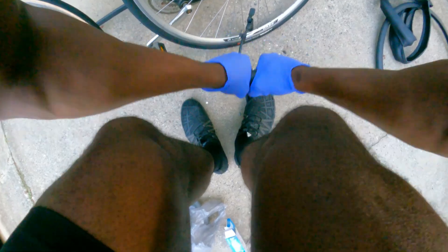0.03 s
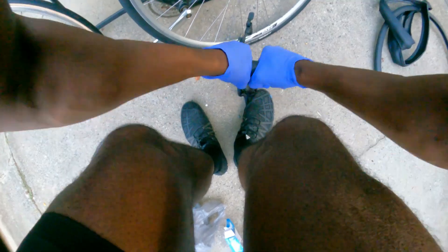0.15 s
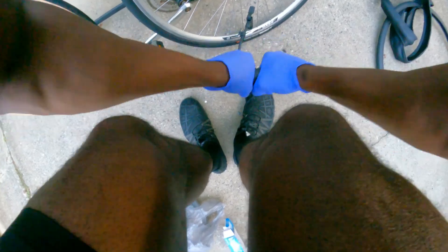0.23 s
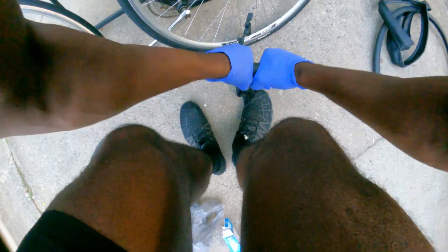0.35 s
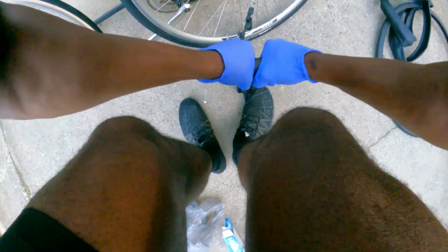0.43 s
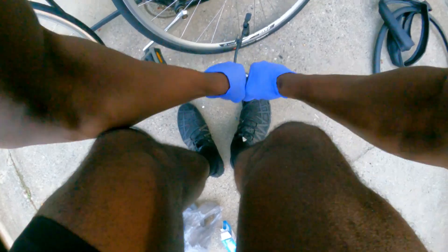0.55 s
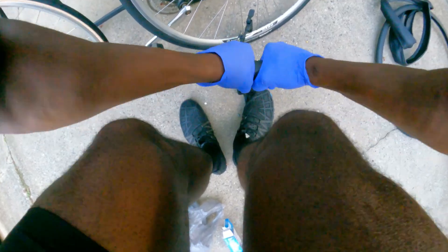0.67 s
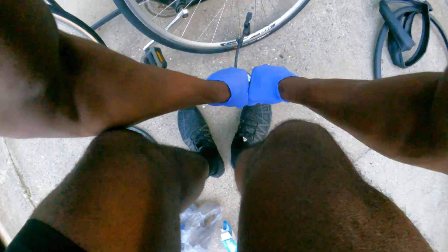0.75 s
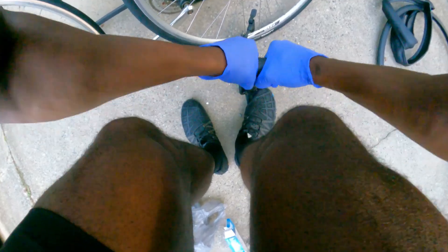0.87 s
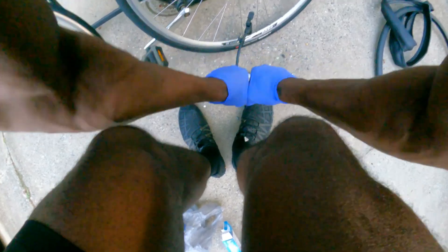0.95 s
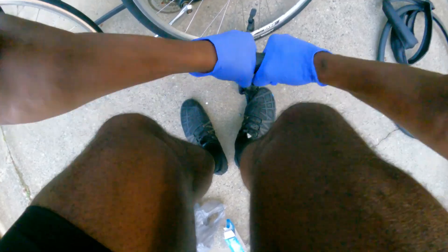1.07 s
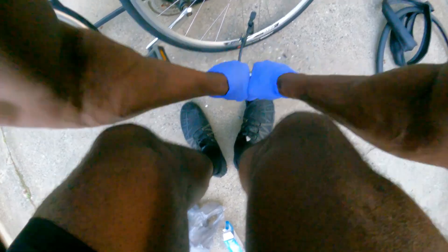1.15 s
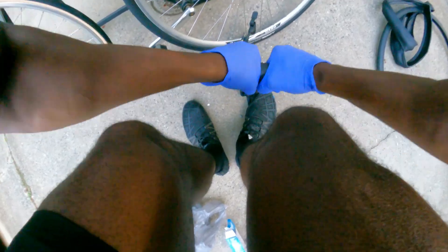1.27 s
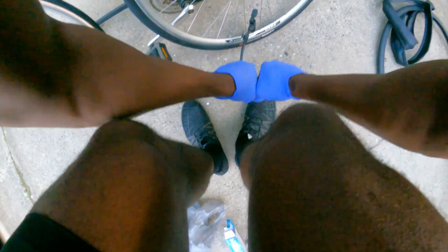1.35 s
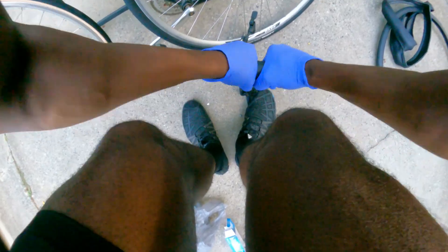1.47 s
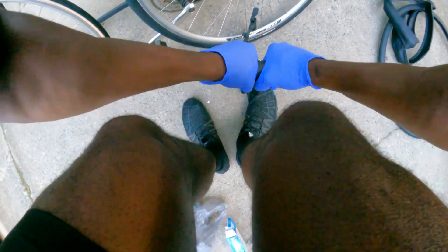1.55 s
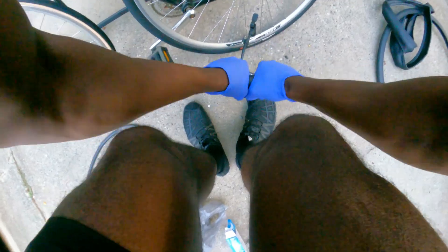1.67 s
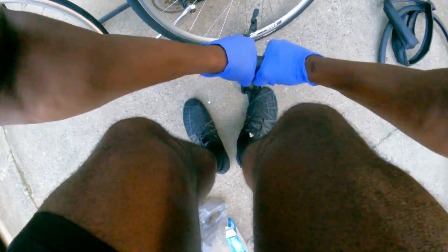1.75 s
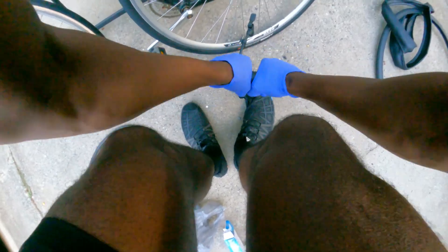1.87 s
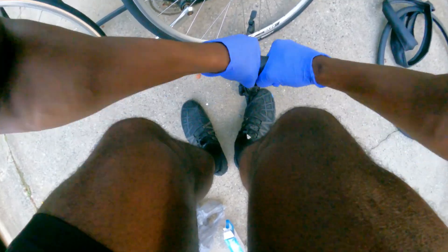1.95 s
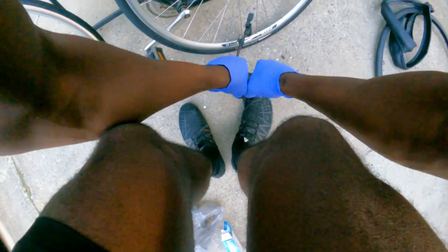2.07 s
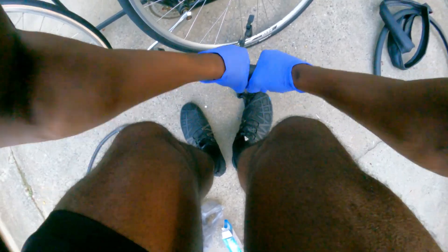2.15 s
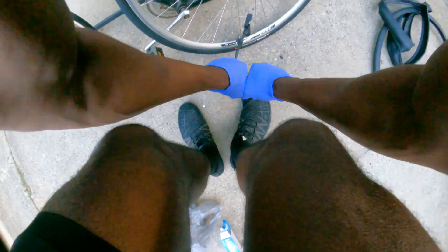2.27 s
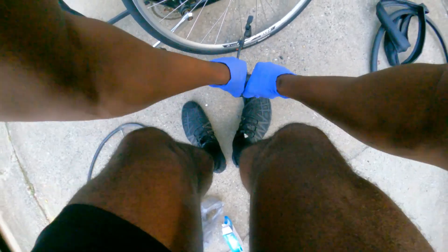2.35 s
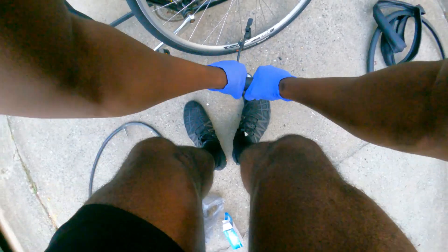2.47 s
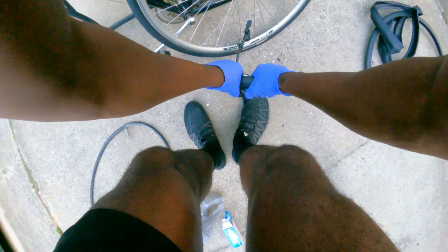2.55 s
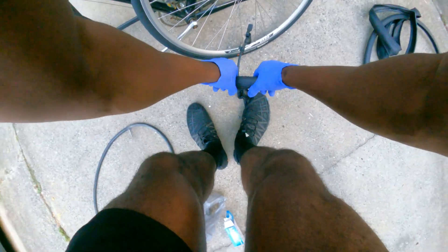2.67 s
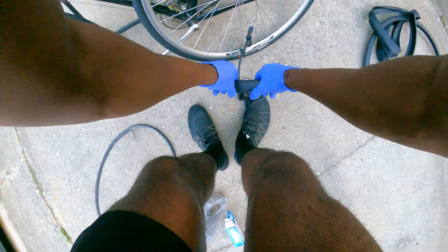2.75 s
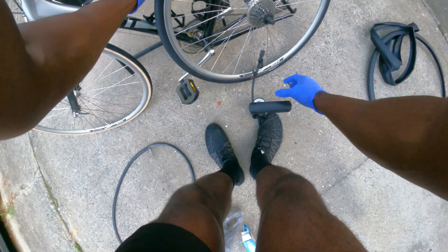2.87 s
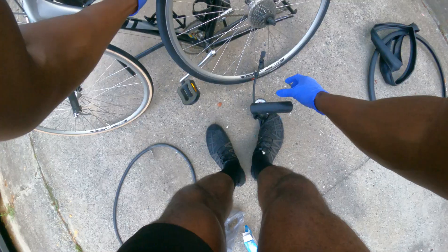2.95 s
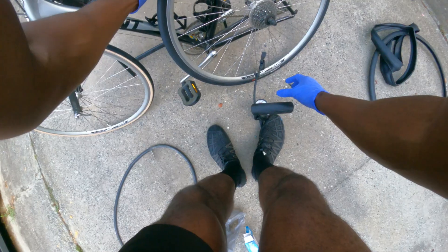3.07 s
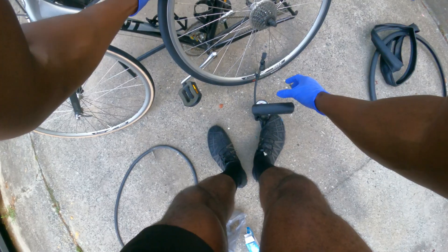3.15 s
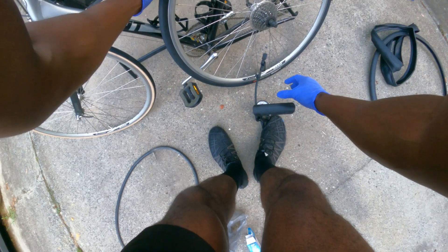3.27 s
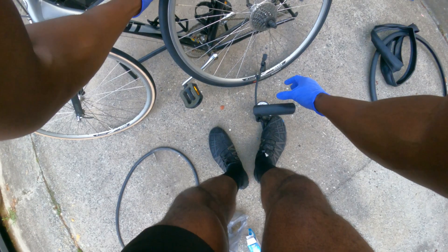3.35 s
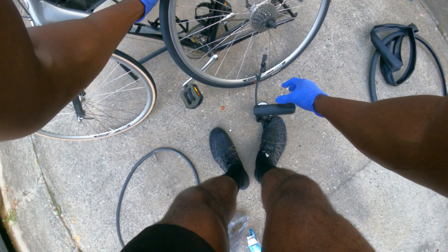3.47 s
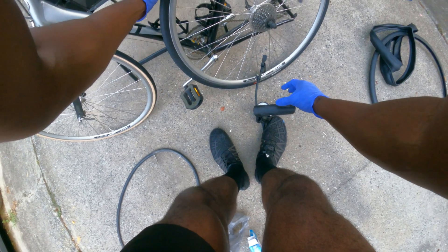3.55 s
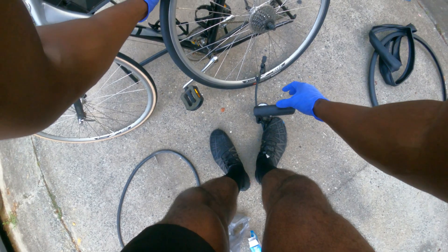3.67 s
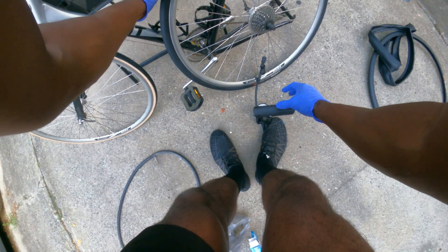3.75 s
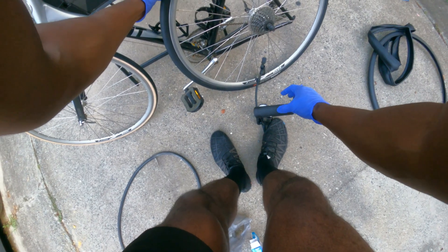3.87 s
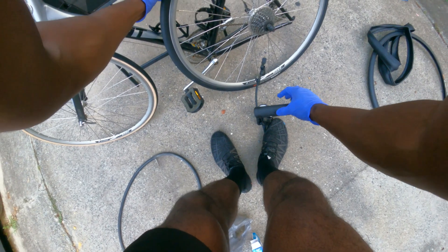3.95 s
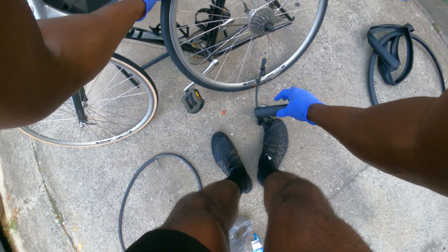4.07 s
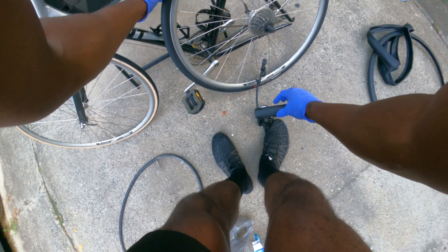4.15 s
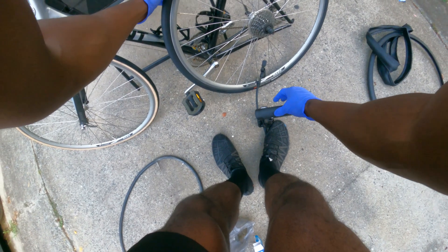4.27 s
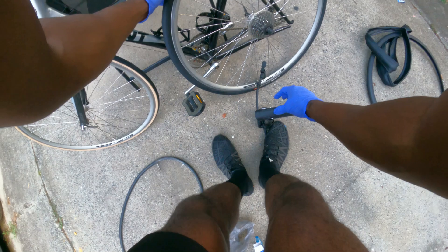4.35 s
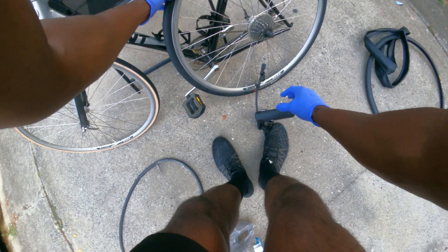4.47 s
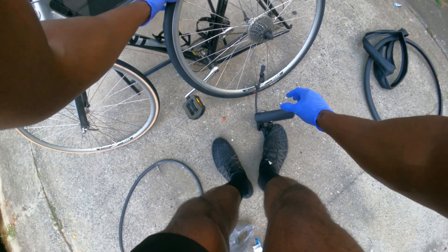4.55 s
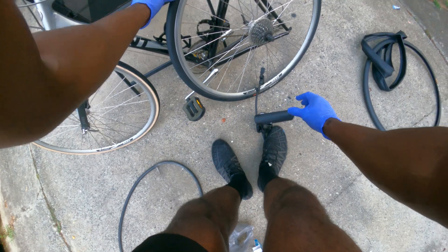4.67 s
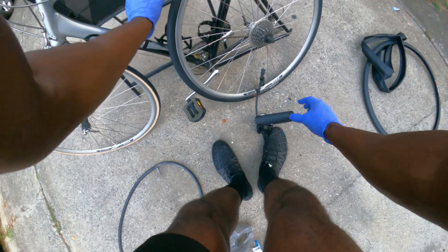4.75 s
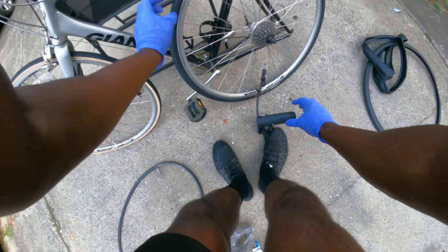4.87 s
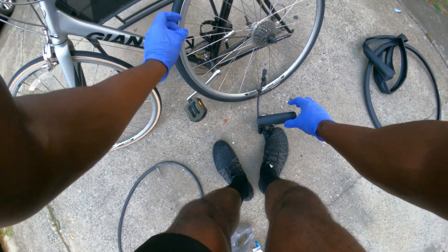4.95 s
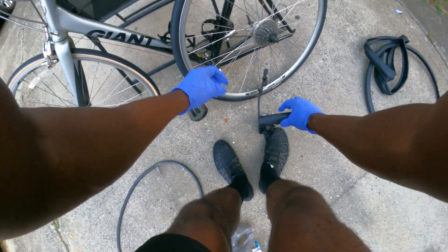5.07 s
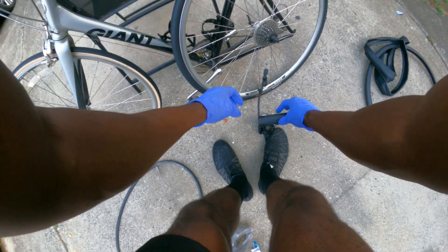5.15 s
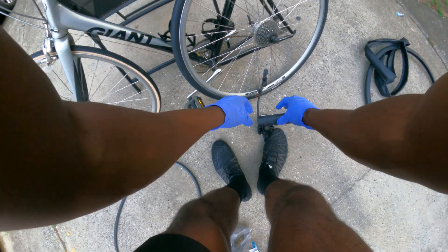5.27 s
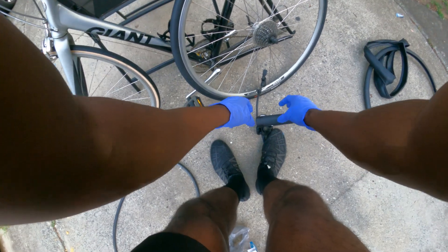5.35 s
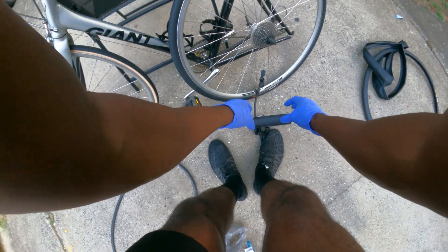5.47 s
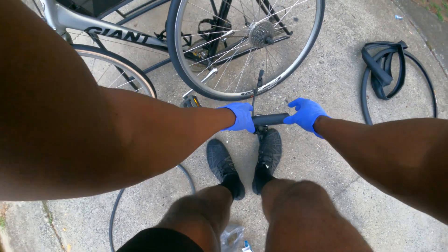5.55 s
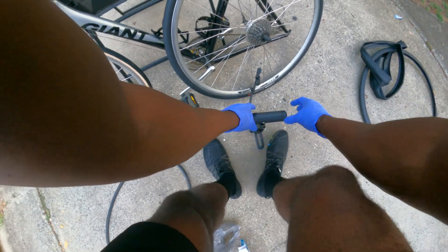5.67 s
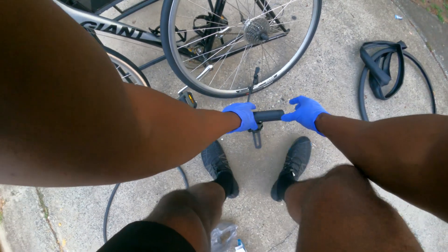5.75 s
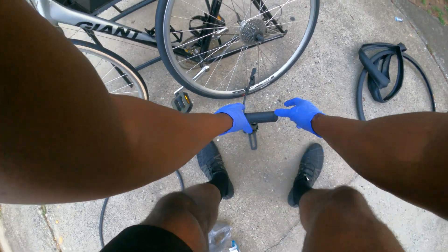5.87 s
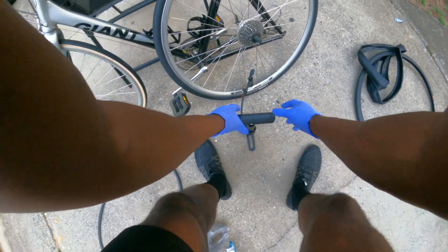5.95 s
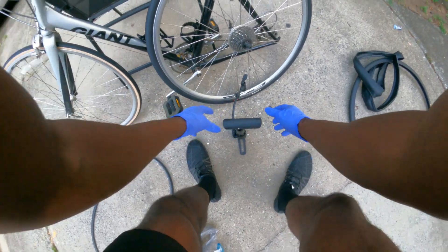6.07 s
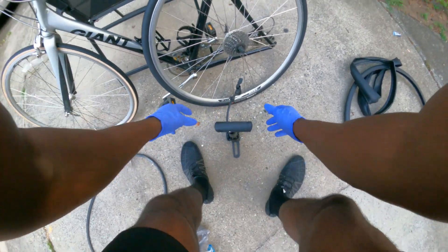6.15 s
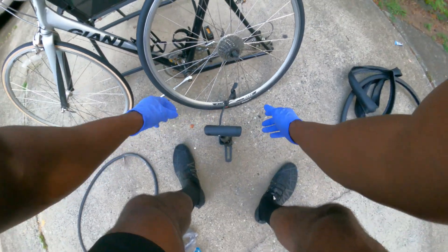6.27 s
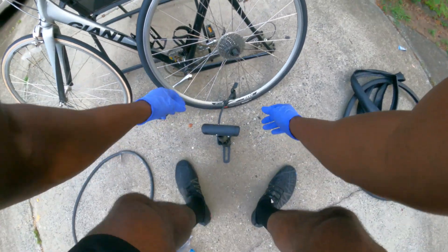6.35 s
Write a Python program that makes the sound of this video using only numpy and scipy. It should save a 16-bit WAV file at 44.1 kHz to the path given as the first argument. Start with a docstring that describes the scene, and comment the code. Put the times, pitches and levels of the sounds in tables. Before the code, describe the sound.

Outdoors on concrete, a body-worn microphone just above a bicycle pump catches twelve fast, loud clacks, uneven in brightness, with low jolts, rubbing and thin squeaky air on each upstroke. The pumping ends abruptly. Distant rumble remains, a nearby songbird chirps three quick phrases, farther birds whistle downward, plastic clicks under a gloved hand, and a hollow thump and scuffing soles close the scene.

```python
"""Floor pump on a concrete yard

Twelve fast strokes, close below a worn camera with two microphone ports: struck-body clacks, valve
snaps, knocks of the loose rod, filtered-noise rubbing and inlet air laced with thin whistles.
Then the pump is let go: resonant clicks and bumps, noise scuffs from the shoes, gliding-tone songbirds.
Walls and trees answer with scattered echoes, over a low outdoor rumble of coloured noise."""
import sys
import numpy as np
from scipy import signal
from scipy.fft import rfft, irfft
from scipy.io import wavfile

SR = 44100
rng = np.random.default_rng(int(sys.argv[2]) if len(sys.argv) > 2 else 0)


def store_pcm(level_fs):
    """Save levels as 16-bit WAV."""
    pcm = np.round(np.clip(level_fs, -1, 1) * 32767).astype(np.int16)
    wavfile.write(sys.argv[1], SR, np.atleast_2d(pcm).T)


N = 282681
T = np.arange(N) / SR  # s

# piston hits bottom: start_s, level_db, crack_db and thud_db (both relative), valve_lead_s
STROKES = [(0.029, -5.5, 5.5, -0.5, 0.013), (0.2508, -5, -7, -6, 0.02), (0.4513, -4.5, 6, 0.5, 0.0083),
           (0.6816, -5, 3, 0, 0.01), (0.9012, -5, 7.5, 0.5, 0.0078), (1.1223, -4.5, -1, -2.5, 0.011),
           (1.3420, -5, -5.5, -3, 0.015), (1.5644, -7.5, -5, 0, .0144), (1.7741, -3, -8, -10, .0096),
           (1.9864, -3, -1, -5, 0.0066), (2.2124, -6.5, 8, 3.5, .0067), (2.4495, -5, 1.5, -0.5, 0.0073)]
# rod knocks, mostly as the handle turns at the top: start_s, level_db, low_db (relative)
ROD_KNOCKS = [(.088, -26, -3), (.170, -33.5, 7), (.372, -27.5, -2.5), (.608, -26, -12), (.657, -35, -16),
              (.838, -34, 5.5), (.863, -31.5, -14), (1.080, -27, -16), (1.267, -24.5, -3), (1.489, -33, 4),
              (1.537, -39, -8), (1.706, -32.5, 3.5), (1.922, -38.5, 8.5), (2.149, -33.5, 6),
              (2.384, -31.5, 3), (2.577, -34.5, -10), (2.706, -35, -7)]
# hands and shoes bump the pump: start_s, level_db, thump_db and ring_db (both relative)
BUMPS = [(5.3594, -20.5, 2, -8.5), (6.071, -37, 1, -23), (6.0789, -26, -9, -39), (6.2333, -25.5, -14, -2)]
# small plastic clicks as the handle is touched: start_s, level_db, centre_hz, t60_s
CLICKS = [(3.309, -34.5, 5500, 0.026), (3.428, -37, 5500, 0.08), (3.434, -36, 2180, 0.094),
          (3.467, -38.5, 5500, 0.055), (3.481, -34, 4560, 0.036), (3.486, -34.5, 1300, 0.1),
          (4.606, -37.5, 3050, 0.018), (4.6393, -28.5, 2220, 0.016)]
# spectra of a blow on the barrel, the foot and the small fittings: freq_hz, level_db (relative)
BARREL = [(450, -37), (700, -10.5), (900, 3), (1200, 5.5), (1500, 2), (1750, 1), (2150, -15.5), (2900, -18),
          (4500, -36.5), (9000, -63)]
FOOT = [(30, -14.5), (110, 4), (210, -1), (350, -2.5), (480, -11), (650, -26), (2000, -54)]
FITTINGS = [(900, -32), (2000, 6), (2800, 9.5), (4600, 4), (7000, -5.5), (9000, -25), (12000, -25),
            (15000, -37)]
# spectrum of the valve snap and of the air through it: freq_hz, level_db (relative)
VALVE_TONE = [(1500, -7), (3000, -6.5), (3700, 1), (5500, -2.5), (6500, -13.5), (7600, -8.5), (9500, -22),
              (12000, -19), (15000, -48)]
# air inlet resonances: freq_hz, width_hz (doubled in each of two passes), level_db (relative)
INLET = [(3050, 140, -18), (3670, 110, 6), (4940, 110, -10), (5760, 260, 11), (7200, 150, -1),
         (7000, 380, 9.5), (11900, 800, 8)]
# spectrum of the seal rubbing along the barrel: freq_hz, level_db (relative)
SEAL_RUB = [(120, -34), (200, -7), (282, -20), (591, -14), (761, -28.5), (929, -11), (1070, -24.5),
            (1570, -26), (2550, -30.5), (3600, -26), (5070, -28.5), (6770, -32), (9550, -38),
            (11900, -39.5), (15000, -60)]
# a near songbird's phrase, one row a note:
# start_s (from its loudest note), length_s, start_hz, middle_hz, end_hz, level_db (relative)
PHRASE = [(-.138, 0.1, 2410, 2440, 2505, -18.5), (-.068, .055, 2514, 3080, 2900, -12),
          (0, .092, 3950, 3662, 3040, -4.5), (.12, .02, 6700, 5500, 4450, -22),
          (.137, .022, 4600, 5080, 5400, -10), (.154, .02, 4315, 3095, 2060, -11),
          (.17, 0.051, 2150, 1846, 1610, -16)]
# when the phrase is sung: loudest_note_s, level_db
PHRASE_TIMES = [(3.373, -36.5), (3.79, -33), (4.206, -33)]
# a farther bird's falling whistle: start_s, length_s, start_hz, middle_hz, end_hz, level_db (relative)
FALLING_WHISTLE = [(0.0026, .35, 3650, 2140, 1610, -7.5)]
# when it falls: start_s, level_db
FALLING_TIMES = [(3.621, -53.5), (4.18, -50), (4.741, -52), (5.295, -52.5), (5.85, -53.5)]
# a short far peep, up and partly down: start_s, length_s, start_hz, middle_hz, end_hz, level_db (relative)
PEEP = [(0.0015, 0.067, 2100, 4700, 3460, -5)]
# when it peeps: start_s, level_db
PEEP_TIMES = [(5.66, -65), (5.95, -62), (6.165, -54)]
# a low far whistle, sinking a little: start_s, length_s, start_hz, middle_hz, end_hz, level_db (relative)
LOW_WHISTLE = [(0.0029, 0.21, 2160, 2100, 1880, 0.5)]
# when it whistles: start_s, level_db
LOW_WHISTLE_TIMES = [(5.78, -60), (6.3, -53.5)]
# spectrum of soles on concrete: freq_hz, level_db (relative)
SOLE = [(500, 2), (1200, -1.5), (3800, -4), (7000, -5.5), (9000, -14.5), (12000, -18), (14500, -39)]
# shoe soles drag over concrete: loudest_s, rise_s, fall_s, level_db
SCUFFS = [(2.68, 0.23, 0.21, -62), (4.83, .05, 0.034, -62), (5.82, 0.091, 0.081, -52),
          (6.26, 0.18, 0.094, -49), (6.4, .05, .06, -55.5)]
# spectrum of the open yard before its final shaping: freq_hz, level_db (relative)
YARD = [(15, -48), (25, -5), (54, -0.5), (104, -9), (177, -9.5), (286, -16.5), (344, -21), (403, -22.5),
        (539, -33), (824, -25.5), (1510, -30), (1820, -31), (3100, -44), (7610, -46), (14000, -82)]
# how wide the yard stands, before the same shaping: freq_hz, side_minus_mid_db
YARD_SIDE = [(60, -24), (110, -19), (200, -14.5), (370, -9.5), (690, -4), (1270, -6), (2340, -2),
             (4310, -7), (7940, -15), (14600, -14)]
# course of the yard's level, before a common lift: time_s, level_db
YARD_LEVEL = [(2.5, -47.5), (2.85, -51.5), (3.1, -46), (3.6, -45.5), (4.4, -44), (5.3, -43), (6.4, -43)]
# spectrum of a knock on the plastic handle: freq_hz, level_db (relative)
HANDLE = [(90, -18), (200, -45), (600, -2.5), (800, -5.5), (1150, 4.5), (1650, 1), (2100, -11), (3600, -19),
          (5200, -18.5), (8000, -28), (13000, -58)]
# ringing modes of the rod: freq_hz, level_db (relative), t60_s
ROD_MODES = [(3430, -4, 0.13), (3630, 9, 0.02), (4727, -15, .05)]
# how far the left microphone port lags the right: freq_hz, lag_rad
PORTS = [(100, .1), (350, .5), (690, .9), (1000, .6), (1400, .9), (2100, 1.4), (2900, .2), (4300, .6),
         (6400, .4), (8000, .1)]

TOP_HZ = 14300  # upper edge of the camera's passband
# the firmer the thud, the stronger the piston rebounds
REBOUND_DB, REBOUND_PER_THUD_DB = -10.5, 1.3
VALVE_DB = -22.5
ROD_BRIGHT_DB = 7.5
# the pull lifts the foot with a dull knock, at this share of the time to the next clack
LIFT_SHARE, LIFT_DB, LIFT_LOW_DB, LIFT_BRIGHT_DB = .23, -34, 8, 12
# the rod chatters on the way down: window before the clack (s), then level and colour
CHATTER_FROM_S, CHATTER_TO_S = 0.033, .014
CHATTER_DB, CHATTER_LOW_DB, CHATTER_BRIGHT_DB = -32.5, -11.5, 7
# it also ticks anywhere in the stroke; the scatter is for chatter and ticks alike
TICK_DB, TICK_LOW_DB, TICK_BRIGHT_DB, SCATTER_DB = -42.5, -2, 6, 5
# the glove crackles as it closes on the handle, up to the spread before or after
GRIP_S, GRIP_SPREAD_S, GRIP_DB = 3.47, .09, -40.5
GRIP_LOW_HZ, GRIP_HIGH_HZ, GRIP_T60_S = 2500, 7000, 0.042
FLOOR_HISS_DB = -72  # a faint hiss stays under the scuffs throughout
RUSH_S, RUSH_DB = 0.0037, -46  # air through the valve around the moment it shuts
# every note swells and dies away over these shares of its length
NOTE_ATTACK, NOTE_RELEASE = 0.13, 0.23


def undb(db):
    """Decibels to gain."""
    return 10 ** (np.asarray(db) / 20)


def unit(x):
    """Scale to rms 1."""
    return x / np.sqrt(np.mean(x ** 2))


def crest(x):
    """Scale to peak 1."""
    return x / np.abs(x).max()


def gains(points, size):
    """A (Hz, dB) spectrum as a gain for every frequency bin, interpolated over log frequency."""
    hz, db = np.transpose(points)
    bins_hz = np.fft.rfftfreq(size, 1 / SR)
    return undb(np.interp(np.log(bins_hz + 1), np.log(hz), db))


def colour(x, points):
    """Filter a sound by a (Hz, dB) spectrum without shifting phase."""
    size = x.shape[-1]
    return irfft(rfft(x) * gains(points, size), size)


def noise(points, size=N):
    """Coloured noise of rms 1."""
    return unit(colour(rng.standard_normal(size), points))


def wide(points, side_db):
    """Coloured noise at two microphones: a shared part, and an unrelated part opposed left to right."""
    return noise(points) + undb(side_db) * noise(points) * np.array([[1], [-1]])


def blow(points, size=4096):
    """Causal, minimum-phase response of a heavily damped body to one blow, at peak 1."""
    cepstrum = irfft(np.log(gains(points, size)))
    # folding the cepstrum puts all the energy after the blow
    cepstrum[1:size // 2] *= 2
    cepstrum[size // 2 + 1:] = 0
    return crest(irfft(np.exp(rfft(cepstrum))))


def fade(t60, size=4096):
    """Exponential decay by 60 dB in t60 seconds."""
    return np.exp(-np.log(1000) * T[:size] / t60)


def crack(points, t60, size=4096):
    """A short burst of many small contacts: noise that builds up in about a millisecond, then decays."""
    return noise(points, size) * fade(t60, size) * (1 - fade(0.0043, size)) * 0.85


def resonance(x, hz, width_hz):
    """Two-pole band-pass."""
    return signal.lfilter(*signal.iirpeak(hz, hz / width_hz, fs=SR), x)


def pan(x, db):
    """Place a sound by its left minus right level."""
    return x * undb(np.array([[db], [-db]]) / 2)


def add(track, s, x):
    """Mix x into the track at time s."""
    i = max(int(s * SR), 0)
    track[i:i + len(x)] += x[:max(N - i, 0)]


def echoes(x, t60, gap_s, size=SR):
    """Scattered reflections from walls and trees: decaying spiky noise, different on each side."""
    # cubing leaves a few strong reflections among many weak ones
    tail = rng.standard_normal((2, size)) ** 3 * fade(t60, size) * (T[:size] > gap_s)
    tail = tail / np.sqrt(np.sum(tail ** 2) / 2)
    return signal.fftconvolve(x[None], tail, axes=1)[:, :N]


def ports(x):
    """One sound as the two microphone ports receive it, split by a phase lag for each frequency."""
    hz, lag = np.transpose(PORTS)
    lag = np.interp(np.fft.rfftfreq(N, 1 / SR), hz, lag)
    turn = np.exp(.5j * lag * np.array([[-1], [1]]))
    return irfft(rfft(x) * turn, N)


def cycles():
    """Start and end time of every full up-and-down stroke, from clack to clack."""
    return [(this[0], following[0]) for this, following in zip(STROKES, STROKES[1:])]


def each_stroke(delay_s, length_s):
    """A smooth swell that follows every clack but the last."""
    return sum(np.exp(-((T - row[0] - delay_s) / length_s) ** 2) for row in STROKES[:-1])


def knocks(rows, t60):
    """Lighter blows on the same barrel, foot and fittings, each a damped response plus noise bursts."""
    out, ring = np.zeros(N), blow(BARREL)
    low = crest(resonance(blow(FOOT), hz=318, width_hz=710))
    for s, db, low_db, bright_db in rows:
        body = undb(-5.0) * ring + undb(0.5) * crack(BARREL, t60)
        tick = undb(bright_db - 19.5) * crack(FITTINGS, t60)
        add(out, s, undb(db) * (body + undb(low_db) * low + tick))
    return colour(out, [(4500, -1.5), (8000, 14), (12000, -11)])


def yard():
    """Distant traffic and light air all around: wide coloured noise whose level slowly wavers."""
    mid, side = noise(YARD), colour(noise(YARD), YARD_SIDE)
    waver = undb(1 * noise([(6, 9), (25, -78.0)]))
    level_db = np.interp(T, *np.transpose(YARD_LEVEL))
    air = mid + side * np.array([[1], [-1]])
    air = colour(air, [(25, -3), (45, 0.5), (900, 2.5), (12000, -5.0)])
    return pan(air * waver * undb(level_db + 1.5), db=2.0)


def scuffs():
    """Grit rolls under the soles: rough noise, each drag swelling and dying away over a faint hiss."""
    grit = undb(2 * noise([(100, 5), (500, -38.0)]))
    drag = sum(undb(db) * np.exp(-((T - s) / np.where(T < s, rise, fall)) ** 2)
               for s, rise, fall, db in SCUFFS)
    return wide(SOLE, side_db=-7.0) * grit * (drag + undb(FLOOR_HISS_DB))


def sliding():
    """The seal rubs unevenly along the barrel while the pump is worked; air rushes as the valve shuts."""
    working = np.interp(T, [0, 2.45, 2.62], [1, 1, 0])
    grip = undb(2.5 * noise([(30, 0), (120, -50)]))
    rub = undb(-52.0) * wide(SEAL_RUB, side_db=-5.0) * working * grip
    rush = sum(np.exp(-((T - s + lead_s) / RUSH_S) ** 2) for s, *_, lead_s in STROKES)
    return rub + undb(RUSH_DB) * rush * wide(VALVE_TONE, side_db=4)


def valve():
    """A bright noise snap as the flow into the tyre stops, with a longer wisp of air behind it."""
    out = np.zeros(N)
    for s, *_, lead_s in STROKES:
        snap = crack(VALVE_TONE, t60=0.014)
        wisp = undb(-19) * crack(VALVE_TONE, t60=0.032)
        add(out, s - lead_s, undb(VALVE_DB) * (snap + wisp))
    return out


def clacks():
    """The piston strikes bottom and rebounds; the foot thuds on the concrete, the fittings crack."""
    barrel, rest = np.zeros(N), np.zeros(N)
    ring, thud, rebound_s = blow(BARREL), blow(FOOT), .00165
    for s, db, crack_db, thud_db, _ in STROKES:
        # a harder contact also brightens the barrel
        hit = colour(ring, [(1250, 0.0088), (2000, 0.5 * crack_db)])[:len(ring) // 2]
        rebound_db = db + REBOUND_DB + REBOUND_PER_THUD_DB * thud_db
        add(barrel, s, undb(db) * hit)
        add(barrel, s + rebound_s, undb(rebound_db) * hit)
        add(rest, s + 0.0015, undb(db + thud_db - 6.0) * thud)
        add(rest, s + 0.00024, undb(db + crack_db - 18.5) * crack(FITTINGS, t60=0.014))
    # filtered forwards, then backwards: a narrow note swells into each clack and out of it
    note = resonance(barrel, hz=898, width_hz=77)
    note = resonance(note[::-1], hz=915, width_hz=91)[::-1]
    return barrel + undb(5.5) * note + rest


def jolts():
    """Each stroke shakes the camera (a decaying low sine) and fans air over its ports, mostly the left."""
    sway = np.zeros(N)
    for row in STROKES:
        hz = 33 * (1 + 0.32 * rng.uniform(-0.83, 1))
        wobble = np.sin(2 * np.pi * hz * T[:8192]) * fade(t60=0.21, size=8192)
        add(sway, row[0] + 0.00624, undb(-19.5) * wobble)
    # unrelated noise at each port
    buffet = np.array([noise([(12, -10), (28, 13.5), (55, 4.5), (130, -11), (300, -33), (700, -73)])
                       for _ in range(2)])
    gusts = each_stroke(delay_s=0.017, length_s=0.038)
    gusts = gusts + undb(-10) * each_stroke(delay_s=0.16, length_s=0.048)
    return pan(sway, db=16.5) + pan(undb(-25) * buffet * gusts, db=8)


def chatter():
    """The loose rod chatters just before the clack that ends each cycle and ticks at random throughout."""
    rows = []
    for start, end in cycles():
        for s in rng.uniform(end - CHATTER_FROM_S, end - CHATTER_TO_S, size=2):
            db = CHATTER_DB + SCATTER_DB * rng.standard_normal()
            rows.append((s, db, CHATTER_LOW_DB, CHATTER_BRIGHT_DB))
        for s in rng.uniform(start, end, size=4):
            db = TICK_DB + SCATTER_DB * rng.standard_normal()
            rows.append((s, db, TICK_LOW_DB, TICK_BRIGHT_DB))
    return knocks(rows, t60=0.019)


def whistles(low_hz, high_hz, rise_per_s, waver_hz, from_s, spread_s, db, count):
    """Thin, broken whistles on every upstroke: wavering tones that rise as the piston speeds up."""
    out, t = np.zeros(N), T[:SR // 20]
    for start, _ in cycles():
        for when, high, loud in rng.random((count, 3)):
            hz = (low_hz + (high_hz - low_hz) * high) * (1 + rise_per_s * t)
            hz = hz + waver_hz * noise([(400, 0), (1500, -36)], len(t))
            glide = np.hanning(len(t)) * np.sin(2 * np.pi * np.cumsum(hz) / SR)
            add(out, start + from_s + spread_s * when, undb(db + 5.3 * loud) * glide)
    return out * undb(3 * noise([(100, 0), (300, -40)]))


def intake():
    """Air hisses through the inlet's resonances on the upstroke, with a weave of whistles in it."""
    air = rng.standard_normal((2, N))
    air = air[0] + undb(-4) * air[1] * np.array([[1], [-1]])
    hiss = unit(sum(undb(db) * resonance(resonance(air, hz, 2 * width), hz, 2 * width)
                    for hz, width, db in INLET))
    weave = whistles(low_hz=2680, high_hz=5740, rise_per_s=10, waver_hz=100,
                     from_s=.045, spread_s=.06, db=-60.5, count=7)
    shrill = whistles(low_hz=5700, high_hz=7300, rise_per_s=3.5, waver_hz=90,
                      from_s=.045, spread_s=0.076, db=-62.5, count=5)
    breath = undb(-55.5) * hiss * each_stroke(delay_s=0.1, length_s=0.028)
    return pan(breath + weave + shrill, db=2.0)


def rattles():
    """The foot knocks as the pull begins, and the rod in its guide, mostly as the handle turns at the top."""
    lifts = [(start + LIFT_SHARE * (end - start), LIFT_DB, LIFT_LOW_DB, LIFT_BRIGHT_DB)
             for start, end in cycles()]
    turns = [(s, db, low_db, ROD_BRIGHT_DB) for s, db, low_db in ROD_KNOCKS]
    return knocks(lifts + turns, t60=0.022)


def song(notes, starts, rasp=0.):
    """Tones gliding through three pitches, a little unsteady; rasp roughens pitches above 4400 Hz."""
    out = np.zeros(N)
    for start, level_db in starts:
        for s, length, *pitches, db in notes:
            along = np.linspace(0, 1, int(length * SR))
            curve = np.polyfit([0, .5, 1], np.log(pitches), 2)
            pitch = np.exp(np.polyval(curve, along))
            unsteady = noise([(200, 0), (700, -40)], SR)[:len(along)]
            pitch *= 1 + (.006 + rasp * (pitch > 4400)) * unsteady
            swell = np.clip(np.minimum(along / NOTE_ATTACK, (1 - along) / NOTE_RELEASE), 0, 1)
            tone = np.sin(2 * np.pi * np.cumsum(pitch) / SR)
            add(out, start + s, undb(level_db + db) * swell * tone)
    return out


def birds():
    """Birds in the trees, near and far; nearby walls double the near notes, and late echoes hang in the air."""
    near = song(PHRASE, PHRASE_TIMES, rasp=.03)
    far = song(FALLING_WHISTLE, FALLING_TIMES) + song(PEEP, PEEP_TIMES)
    far = far + song(LOW_WHISTLE, LOW_WHISTLE_TIMES)
    early = undb(-0.5) * echoes(near, t60=0.17, gap_s=0.0061)
    # the late echo is strongest around 5500 Hz and weaker above
    distant = colour(near, [(3000, 0.5), (4000, 1.5), (4800, 1.5), (5500, 8.5), (6400, -3)])
    late = undb(-4.5) * echoes(distant, t60=1.0, gap_s=0.028)
    late = late + undb(2.5) * echoes(far, t60=0.59, gap_s=0.0031)
    # the direct sound of the far birds flutters in level
    flutter = undb(3 * noise([(15, 0), (60, -40)]))
    return ports(near + undb(0.5) * far * flutter) + early + late


def clicks():
    """Tiny gritty contacts, each with one broad resonance; a flurry of them as the glove takes hold."""
    out = np.zeros(N)
    grip = []
    for when, high in rng.random(size=(8, 2)):
        s = GRIP_S + GRIP_SPREAD_S * (2 * when - 1)
        hz = GRIP_LOW_HZ * (GRIP_HIGH_HZ / GRIP_LOW_HZ) ** high
        grip.append((s, GRIP_DB, hz, GRIP_T60_S))
    for s, db, hz, t60 in CLICKS + grip:
        grit = rng.laplace(size=4096) * fade(t60)
        add(out, s, undb(db) * crest(resonance(grit, hz, hz / 2)))
    return colour(out, [(6000, 2.5), (9000, -5.5), (13000, -7)])


def bumps():
    """A hollow resonant thump from the foot, a plastic knock and a short ring of sines from the rod."""
    out, t = np.zeros(N), T[:8192]
    impulse = np.eye(1, len(t))[0]
    thump = resonance(impulse, hz=368.5, width_hz=210)
    thump = crest(resonance(thump, hz=370, width_hz=210))
    ring = crest(sum(undb(db) * np.sin(2 * np.pi * hz * t) * fade(t60, len(t))
                     for hz, db, t60 in ROD_MODES))
    for s, db, thump_db, ring_db in BUMPS:
        knock = undb(2.5) * blow(HANDLE) + undb(-3.5) * crack(HANDLE, t60=0.029)
        add(out, s, undb(db) * knock)
        # loose parts go on buzzing for a moment
        add(out, s, undb(db - 15.5) * crack(HANDLE, t60=0.18, size=8192))
        add(out, s + 0.0004, undb(db) * (undb(thump_db) * thump + undb(ring_db) * ring))
    return out


def scene():
    """The pump close below the camera, with its echoes and the yard around it."""
    pump = clacks() + valve() + rattles() + chatter()
    handling = bumps() + clicks()
    walls = undb(-23.0) * echoes(pump, t60=0.16, gap_s=0.0049)
    walls = walls + undb(-9.5) * echoes(handling, t60=0.41, gap_s=0.011)
    close = ports(pump + handling) + intake() + sliding() + jolts()
    return close + walls + birds() + scuffs() + yard()


def record(dry):
    """The camera cuts the top with a steep elliptic low-pass."""
    return signal.sosfilt(signal.ellip(8, .2, 70, TOP_HZ, fs=SR, output="sos"), dry)


dry = scene()
out = record(dry)
store_pcm(out)
```